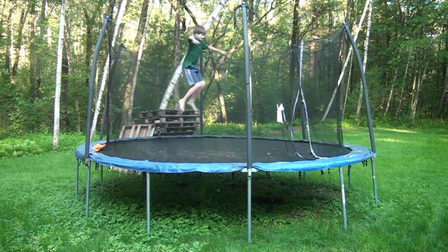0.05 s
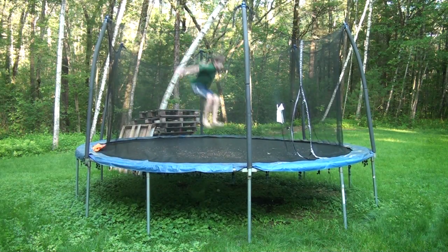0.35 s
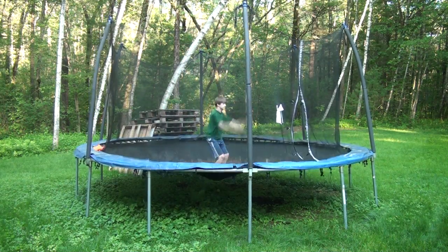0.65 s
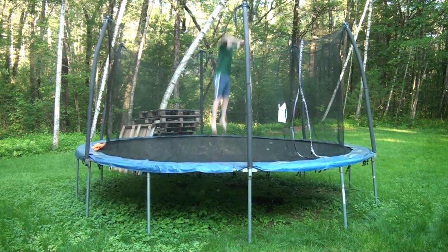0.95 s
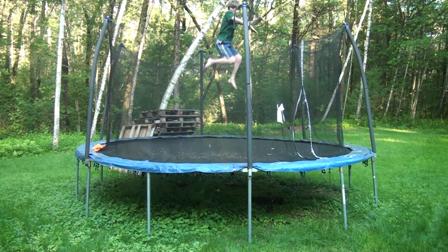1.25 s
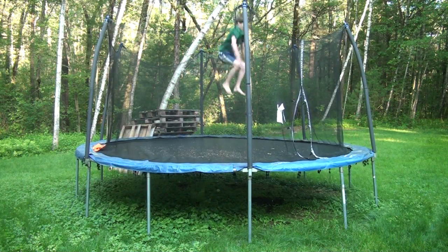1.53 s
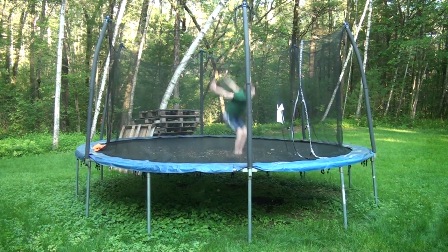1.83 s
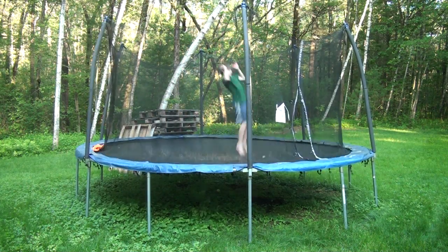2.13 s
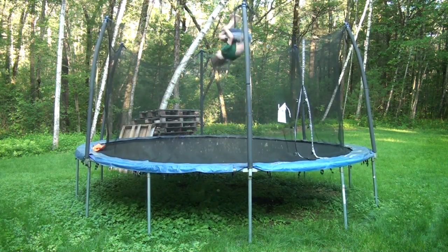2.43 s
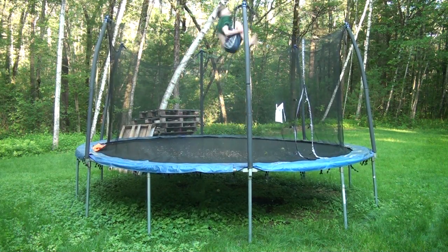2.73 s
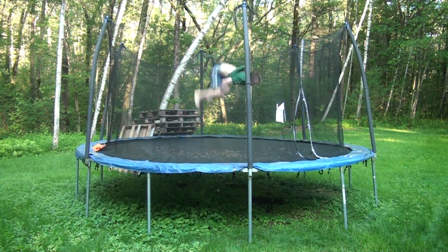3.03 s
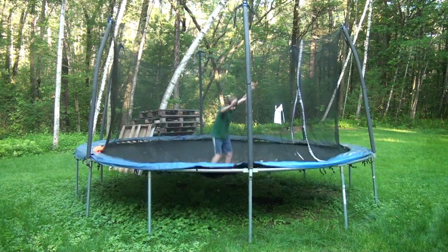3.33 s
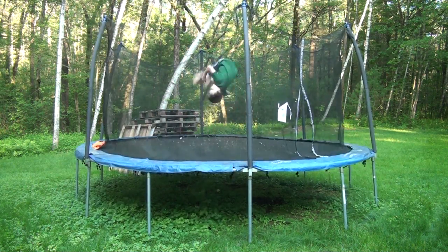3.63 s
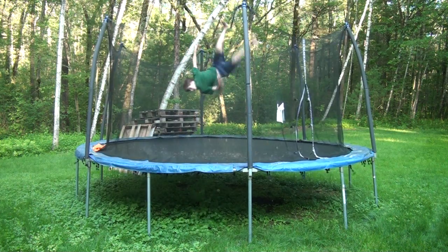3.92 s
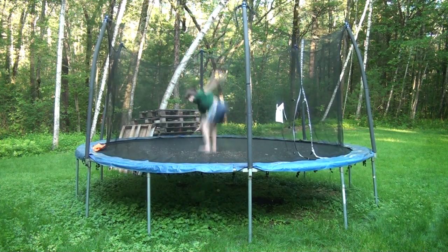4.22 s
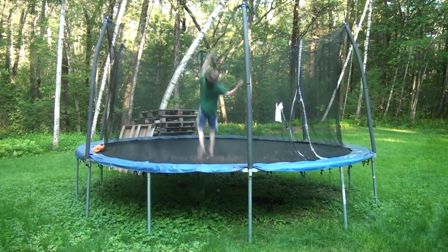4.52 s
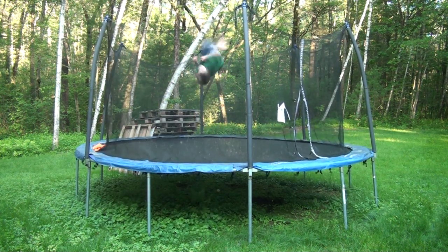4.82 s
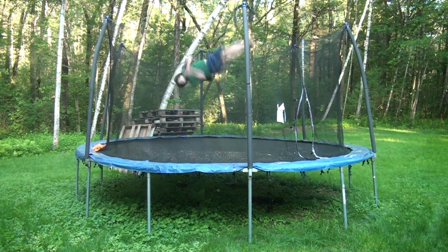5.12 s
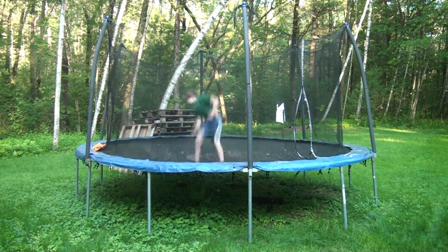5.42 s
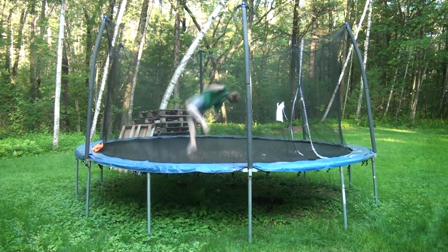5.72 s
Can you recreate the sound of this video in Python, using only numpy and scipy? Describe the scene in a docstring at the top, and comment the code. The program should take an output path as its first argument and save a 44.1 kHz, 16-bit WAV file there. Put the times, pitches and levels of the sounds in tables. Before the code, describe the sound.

Someone bounces on a garden trampoline, with feet slapping the mat and metal springs creaking, clanking and jangling.

```python
"""Five bounces on a garden trampoline

Feet slap the mat a few metres away, and the springs creak as their hooks stick and slip under load.
The frame clanks on each rebound; the unloaded springs jangle and clink while the jumper is in the air.
Fabric rustles, trees echo faintly, and two thin whistles sound over the garden air and a quiet hum."""
import sys
import numpy as np
from scipy import signal
from scipy.fft import rfft, irfft
from scipy.io import wavfile
from scipy.ndimage import uniform_filter1d

SR = 44100
rng = np.random.default_rng(int(sys.argv[2]) if len(sys.argv) > 2 else 0)


def generate_wav(sig):
    """Save sig (samples, or channels by samples) to the path in sys.argv[1] as 16-bit PCM at SR."""
    pcm = np.round(np.clip(np.atleast_2d(sig).T, -1, 1) * 32767).astype(np.int16)
    wavfile.write(sys.argv[1], SR, pcm)


N = 258426
TIME = np.arange(N) / SR
EARLIER_REBOUND_S = -0.35  # the jumper is already in the air at the start

# Levels in all tables are relative.
# the mat sinking: touchdown_s, creak_db, slack_lasts_s, deepest_after_s, boom_db
LANDINGS = [(0.558, -2.5, .085, .15, -34.5), (1.883, -1.5, 0.05, 0.14, -33.5), (3.212, 1, .07, .13, -29),
            (4.296, 1, .092, 0.137, -34), (5.449, 2, 0.052, 0.14, -34.5)]
# the mat whipping back: time_s, clank_db, clank_fall_s, thud_db, thud_lag_s, jangle_db, swing_period_s
REBOUNDS = [(0.777, -16, 0.024, -27.5, 0.023, -1, 0.16), (2.112, -10, 0.015, -24, 0.0076, .5, 0.11),
            (3.433, -11, 0.028, -23.5, 0.017, 1, 0.1), (4.522, -14.5, 0.021, -24.5, .005, -2, 0.128),
            (5.666, -11, 0.019, -24, 0.0023, 1.5, 0.17)]
# spectra of a coil, a hook's snap and its topmost sparkle: frequency_hz, level_db
COIL_SPECTRUM = [(100, -11), (300, -15.5), (600, -6), (950, -6.5), (1200, -3), (1500, -3), (1900, 0.5),
                 (2500, -2.5), (3200, -3), (4200, -10.5), (6000, -9.5), (12000, -49)]
SNAP_SPECTRUM = [(1500, -41), (3500, -13), (4700, -2.5), (5600, 6), (8000, 9), (9500, 3), (11000, -8),
                 (15500, -27)]
SPARKLE_SPECTRUM = [(6000, -36), (9000, -11), (10500, -3), (15500, 11)]


def amp(db):
    """Decibels to amplitude ratio."""
    return 10 ** (np.asarray(db) / 20)


def unit(x):
    """Normalisation to rms 1."""
    return x / np.sqrt(np.mean(x ** 2))


def norm(x):
    """Normalisation to energy 1."""
    return x / np.sqrt(np.sum(x ** 2))


def even(x, window_s):
    """Envelope flattening: short-term rms is held at 1, finer grain remains."""
    return x / np.sqrt(uniform_filter1d(x ** 2, int(window_s * SR)) + 1e-12)


def gains(spectrum, size):
    """Log-frequency interpolation of (frequency_hz, level_db) points to a gain per bin."""
    hz, db = np.transpose(spectrum)
    bin_hz = np.arange(size // 2 + 1) * SR / size
    return amp(np.interp(np.log(bin_hz + 1), np.log(hz + 1), db))


def response(spectrum, size=4096):
    """Minimum-phase impulse response of a spectrum, energy 1."""
    cepstrum = irfft(np.log(gains(spectrum, size)))
    cepstrum[1:size // 2] *= 2
    cepstrum[size // 2 + 1:] = 0
    return norm(irfft(np.exp(rfft(cepstrum))))


def through(x, *responses):
    """Convolution with each impulse response in turn."""
    for h in responses:
        x = signal.fftconvolve(x, h)[:len(x)]
    return x


def ring(modes):
    """Free decay of damped modes (frequency_hz, level_db, t60_s), energy 1."""
    t = TIME[:SR // 2]
    return norm(sum(amp(db - 60 * t / t60) * np.sin(2 * np.pi * hz * t + rng.uniform(0, 2 * np.pi))
                    for hz, db, t60 in modes))


def tone(hz):
    """Sinusoid of rms 1 whose phase is the integral of frequency."""
    return np.sqrt(2) * np.sin(2 * np.pi * np.cumsum(hz) / SR)


def walk(rate_hz):
    """Smooth random modulation, rms 1."""
    hold = max(int(SR / rate_hz), 2)
    steps = np.repeat(rng.standard_normal(N // hold + 1), hold)
    return unit(uniform_filter1d(steps, hold)[:N])


def slips(rate_hz, spread_db):
    """Stick-slip friction as a Poisson train of unequal clicks, rms 1."""
    size = amp(spread_db * np.minimum(rng.standard_exponential(N), 4))
    return unit((rng.random(N) < rate_hz / SR) * size * rng.choice([-1, 1], N))


def swell(peak_s, rise_s, fall_s, start=0.23):
    """Envelope with a jolt, a linear rise and an exponential decay."""
    t = TIME - peak_s
    rise = 1 + (1 - start) * np.minimum(t, 0) / rise_s
    return (t > -rise_s) * rise * np.exp(-np.maximum(t, 0) / fall_s)


def add(track, start_s, sound):
    """Superposition of a sound on a track."""
    i = max(int(start_s * SR), 0)
    track[i:i + len(sound)] += sound[:N - i]


def garden():
    """Ambient noise: broadband outdoor air and a thin, wavering hum."""
    # outdoor air: frequency_hz, level_db
    air_spectrum = [(15, -44), (25, -11), (59, -1.5), (127, -5.5), (180, -5.5), (301, -9.5), (531, -12),
                    (575, -12), (1230, -12.5), (1520, -17.5), (2480, -18), (2840, -22), (4610, -26),
                    (13600, -25.5), (16000, -29)]
    # tones of the hum: pitch_hz, level_db
    hum_tones = [(123.8, -60), (2519, -61.5), (5039, -77)]
    rolloff = response([(3000, 0), (7000, -0.5), (12000, -8)])
    air = through(rng.standard_normal(N), response(air_spectrum), rolloff)
    hum = sum(amp(db) * tone(hz + 4 * walk(rate_hz=25)) for hz, db in hum_tones)
    return unit(air) * amp(-50 + 0.38 * walk(rate_hz=3.46)) + amp(-1.5) * hum


def coil(low_hz, high_hz, t60_s, ring_db, count=24):
    """Impulse response of a spring: a dry tick and the close modes of its wire."""
    h = amp(ring_db) * ring([(hz, 0, t60_s) for hz in rng.uniform(low_hz, high_hz, count)])
    h[0] += 1
    return norm(h)


def springs(low_hz, high_hz, rate_hz, t60_s, ring_db, turn_db):
    """Friction excites the modes of six springs, which take the lead at random."""
    out = 0
    for _ in range(6):
        friction = slips(rate_hz, spread_db=2.5)
        share = amp(turn_db * walk(rate_hz=35) + 3.7 * walk(rate_hz=1.48))
        out += through(friction * share, coil(low_hz, high_hz, t60_s, ring_db, count=12))
    return out


def jangle(fade_db_per_s, hold_s=0.14, depth_db=5.5, settle_s=0.16):
    """Damped oscillation of the empty mat modulates the fading envelope of loose slipping."""
    out = 0
    for s, *_, db, period_s in [(EARLIER_REBOUND_S, -1, 0.14), *REBOUNDS]:
        age = np.maximum(TIME - s, 0)
        swing_db = depth_db * np.exp(-age / settle_s) * np.cos(2 * np.pi * age / period_s)
        fade_db = fade_db_per_s * np.maximum(age - hold_s, 0)
        out += (age > 0) * amp(db + swing_db - fade_db)
    return out


def stretch(power, contact_s=0.26, jolt=0.15, slack_db=-5):
    """Loaded slipping follows a power of the mat's half-sine sag, weaker until the slack is taken up."""
    out = 0
    for s, db, slack_s, _, _ in LANDINGS:
        age = TIME - s
        in_contact = (age > 0) * (age < contact_s)
        sag = np.abs(np.sin(np.pi * age / contact_s))
        out += in_contact * amp(db + slack_db * (age < slack_s)) * (jolt + sag) ** power
    return out


def slipping_db(load_db, power, loose_db, fade_db_per_s):
    """Power sum of the loaded and loose envelopes of the springs."""
    loaded = amp(load_db) * stretch(power)
    loose = amp(loose_db) * jangle(fade_db_per_s)
    return 20 * np.log10(np.hypot(loaded, loose) + 1e-6)


def ticks(rate_hz=45, chatter_s=0.0066):
    """Random transients: lesser hooks snap in decaying bursts of noise."""
    decay = np.exp(-TIME[:SR // 16] / chatter_s)
    bursts = through(np.abs(slips(rate_hz, spread_db=-1)), decay) * rng.standard_normal(N)
    snap = through(bursts, response(SNAP_SPECTRUM))
    sparkle = through(bursts, response(SPARKLE_SPECTRUM))
    return amp(-14) * unit(snap + amp(-16.5) * sparkle)


def creak(bite=1.82):
    """Stick-slip friction: coils sound in the midrange, hooks scrape above; hard scraping sizzles."""
    # a hook scraping: frequency_hz, level_db
    scrape_spectrum = [(2000, -23), (3500, -4), (4800, -10.5), (5600, -5), (6400, -1.5), (7800, -4),
                       (9000, -3.5), (11000, -12), (15500, -17.5)]
    jerks_db = 1.56 * walk(rate_hz=90) + 0.71 * walk(rate_hz=21)
    body_db = slipping_db(load_db=-26.5, power=1.45, loose_db=-32, fade_db_per_s=55) + jerks_db
    scrape_db = slipping_db(load_db=-27, power=1.46, loose_db=-33.5, fade_db_per_s=65.5) + jerks_db
    coils = springs(low_hz=1097.5, high_hz=3031, rate_hz=600, t60_s=0.082, ring_db=-9, turn_db=3.5)
    hooks = springs(low_hz=5584, high_hz=8720, rate_hz=1700, t60_s=0.094, ring_db=-8.5, turn_db=6)
    sizzle = through(slips(rate_hz=2500, spread_db=-6), response(SPARKLE_SPECTRUM))
    sizzle *= amp(bite * scrape_db - 9 + 4.2 * walk(rate_hz=41))
    body = even(through(coils, response(COIL_SPECTRUM)), window_s=0.047)
    scrape = even(through(hooks, response(scrape_spectrum)), window_s=0.03) + ticks()
    return body * amp(body_db) + scrape * amp(scrape_db) + sizzle


def clinks(detune=0.0099):
    """Impact excitation: a hook snaps over, chatters in its eye, rings and shakes its coil."""
    # the loudest snaps: start_s, snap_db, coil_db, sparkle_db, chatter_s
    hook_snaps = [(.018, -44, -29, -37, 0.0066), (.070, -33.5, -30.5, -40, 0.012),
                  (.104, -39, -32, -54, 0.011), (.140, -35.5, -30, -56, 0.0093),
                  (.771, -17.5, -12, -38, 0.0044), (.8945, -17.5, -26, -28, 0.0058),
                  (.921, -31, -15.5, -42, 0.027), (1.024, -15, -18, -23, 0.015),
                  (1.937, -18, -11.5, -36, 0.021), (1.976, -12, -19, -33, 0.017),
                  (2.034, -23, -41, -22, 0.022), (2.184, -13, -27, -20, 0.0075),
                  (2.214, -18, -14.5, -40, 0.023), (2.4515, -25.5, -24.5, -31, 0.0037),
                  (2.559, -28.5, -50, -48, .007), (2.588, -27.5, -34, -47, 0.012),
                  (3.221, -21.5, -21.5, -28, 0.024), (3.282, -14.5, -19.5, -42, .0066),
                  (3.415, -15, -12.5, -35, 0.0045), (3.513, -13.5, -39, -22, 0.015),
                  (3.613, -18, -29, -25, 0.018), (3.644, -15, -21, -24, 0.014),
                  (3.742, -29, -28, -47, .006), (4.113, -34, -44, -57, .018), (4.299, -28, -32, -40, 0.017),
                  (4.346, -18.5, -22, -40, 0.018), (4.3895, -10, -15.5, -30, 0.0036),
                  (4.531, -16, -20, -24, 0.016), (4.604, -14, -28, -22, 0.011),
                  (4.657, -16.5, -33, -29, .005), (4.762, -12.5, -18, -22, 0.015),
                  (4.835, -25, -19.5, -40, 0.017), (4.916, -30, -32, -62, .013),
                  (5.488, -15, -25, -35, 0.0083), (5.547, -12, -23, -35, .007),
                  (5.712, -14, -11, -35, 0.019), (5.812, -6.5, -16, -27, 0.0038)]
    # modes of a steel hook: frequency_hz, level_db, t60_s
    hook_modes = [(6270, -2, 0.036), (6480, 11, 0.072), (7340, -23, 0.13), (7800, 8, 0.057),
                  (8570, 6, 0.028), (9340, -36, 0.062)]
    snaps, sparkles, rings, coils = np.zeros((4, N))
    t = TIME[:SR // 8]
    chatter = even(slips(rate_hz=6600, spread_db=1.5), window_s=0.0069)
    for k, (s, snap_db, coil_db, sparkle_db, chatter_s) in enumerate(hook_snaps):
        burst = norm(chatter[k * len(t):(k + 1) * len(t)] * np.exp(-t / chatter_s))
        burst[0] += min(0.0015 / chatter_s, 0.6)  # a quick snap starts with a harder tick
        steel = ring(np.array(hook_modes) * [1 + detune * rng.standard_normal(), 1, 1])
        add(snaps, s, amp(snap_db + 14) * burst)
        add(sparkles, s, amp(sparkle_db + 19.5) * burst)
        add(rings, s, amp(snap_db + 8.5) * norm(through(burst, steel)))
        add(coils, s, amp(coil_db + 16) * burst)
    wire = coil(low_hz=1082, high_hz=3053, t60_s=0.14, ring_db=-10)
    contact = through(snaps, response(SNAP_SPECTRUM)) + through(sparkles, response(SPARKLE_SPECTRUM))
    return contact + rings + through(coils, response(COIL_SPECTRUM), wire)


def rustle(delay_s=0.52, rise_s=0.1, fall_s=0.4):
    """Friction noise: fine grains of fabric swell near the top of each flight."""
    flight = sum(swell(s + delay_s, rise_s, fall_s, start=0.1) for s, *_ in REBOUNDS)
    flight += amp(-8.5) * swell(EARLIER_REBOUND_S + delay_s, rise_s, fall_s, start=0.1)
    grains = slips(rate_hz=2100, spread_db=0.5) * amp(2 * walk(rate_hz=24))
    fabric = response([(3000, -21), (6000, -4.5), (8500, 1), (14000, -3.5), (16000, -5)])
    return amp(-52.5) * flight * through(grains, fabric)


def whistles(top_hz=2080, glide_s=0.44, length_s=0.22):
    """Frequency modulation: thin, unsteady whistles, probably a far bird, slide down and fade."""
    # faint whistles: start_s, level_db
    calls = [(.36, -63), (1.605, -61)]
    out, t = np.zeros(N), TIME[:int(length_s * SR)]
    hz = top_hz * np.exp(-t / glide_s) * (1 + 0.021 * walk(rate_hz=300)[:len(t)])
    envelope = np.minimum(t / 0.01, 1) * (1 - t / length_s)
    for s, db in calls:
        add(out, s, amp(db) * envelope * tone(hz))
    return out


def footfall(flutter_db, push_s=0.004, flutter_hz=170, flutter_s=0.046, skin_s=0.021):
    """Air displacement: a bare foot pats the mat and drives off one pulse; the cloth flutters."""
    t = TIME[:SR // 6]
    push = np.sin(np.pi * np.minimum(t / push_s, 1)) ** 4
    backswing = 0.26 * np.sin(np.pi * np.clip(t / push_s - 0.5, 0, 1)) ** 2
    cloth = signal.butter(3, [flutter_hz / 2, flutter_hz * 2], "band", fs=SR, output="sos")
    flutter = unit(signal.sosfilt(cloth, rng.standard_normal(len(t)))) * np.exp(-t / flutter_s)
    skin = response([(200, -15), (500, 1), (1500, 4), (3000, -29), (9000, -12)])
    pat = through(rng.standard_normal(len(t)) * np.exp(-t / skin_s), skin)
    return push - backswing + amp(flutter_db - 2.5) * flutter + amp(-21) * pat


def mat(boom_s=0.018):
    """Membrane under impact: feet slap the mat, and at full stretch the taut cloth booms softly."""
    # bare feet meeting the mat: start_s, level_db, flutter_db
    footfalls = [(0.556, -23, -17), (1.884, -21.5, -12), (3.215, -19.5, -10), (4.305, -30, -6.5),
                 (5.448, -17.5, -9.5), (5.5, -18.5, -17.5)]
    slaps = np.zeros(N)
    for s, db, flutter_db in footfalls:
        add(slaps, s, amp(db) * footfall(flutter_db))
    load = sum(amp(db) * np.exp(-((TIME - s - deepest_s) / boom_s) ** 2)
               for s, _, _, deepest_s, db in LANDINGS)
    cloth = response([(25, -14), (55, -8), (80, -7), (104, 4), (135, -1), (190, -14), (500, -36)])
    boom = load * even(through(rng.standard_normal(N), cloth), window_s=0.025)
    highpass = signal.butter(1, 55, "high", fs=SR, output="sos")
    return signal.sosfilt(highpass, slaps) + boom


def frame():
    """Tube resonance: as the mat whips level the joints shift and knock; a low thud follows."""
    # modes of the tubes: frequency_hz, bandwidth_hz, level_db
    tube_modes = [(1166, 70, -2), (1810, 110, 8), (1990, 220, 6.5), (2370, 103, 5.5), (2610, 290, -12),
                  (3760, 300, -16)]
    # spectra of the knocking joints and of the thud: frequency_hz, level_db
    clank_spectrum = [(300, -14.5), (700, -6), (980, -17.5), (1180, 5), (1450, 1.5), (1850, 4.5),
                      (2600, 0.5), (3200, -4.5), (4500, -16.5), (7000, -9), (11000, -17), (15500, -22)]
    thud_spectrum = [(25, -12), (50, -15), (110, -2), (250, -2.5), (500, -6), (800, -9), (1300, -12),
                     (4000, -58)]
    shift = sum(amp(db) * swell(s, rise_s=0.0087, fall_s=fall_s) for s, db, fall_s, *_ in REBOUNDS)
    load = sum(amp(db) * swell(s + lag_s, rise_s=0.025, fall_s=0.026)
               for s, _, _, db, lag_s, *_ in REBOUNDS)
    tubes = ring([(hz, db, np.log(1000) / (np.pi * width_hz)) for hz, width_hz, db in tube_modes])
    knocks = slips(rate_hz=3000, spread_db=-2)
    clank = through(knocks, response(clank_spectrum)) + amp(-4) * through(knocks, tubes)
    thud = through(slips(rate_hz=1500, spread_db=1.5), response(thud_spectrum))
    return amp(-5) * shift * even(clank, window_s=0.02) + amp(1.5) * load * even(thud, window_s=0.0193)


def squeaks():
    """Mode locking: now and then the slipping settles on one mode of a coil."""
    # squeaks of single coils: centre_s, pitch_hz, level_db, half_width_s
    coil_squeaks = [(1.952, 1820, -29, 0.0087), (4.654, 1744, -37, 0.016), (4.73, 1180, -39, 0.015),
                    (4.8, 2210, -42, 0.022)]
    out = 0
    for s, hz, db, half_width_s in coil_squeaks:
        envelope = amp(db) * np.exp(-((TIME - s) / half_width_s) ** 2)
        out += envelope * tone(hz * (1 + 0.021 * walk(rate_hz=160)))
    return out


def glide(centre_s=5.813, hz=447, fall_octaves_per_s=7, half_width_s=0.026):
    """Exponential sweep: a short, hollow, pure tone swells and slides down."""
    age = np.clip(TIME - centre_s, -4 * half_width_s, 4 * half_width_s)
    return amp(-28) * np.exp(-(age / half_width_s) ** 2) * tone(hz * 2 ** (-fall_octaves_per_s * age))


def linger(metal, low_hz=1900, high_hz=2700, t60_s=0.85):
    """Sympathetic vibration: the whole circle of springs sings on quietly once shaken."""
    modes = [(hz, 0, t60_s) for hz in rng.uniform(low_hz, high_hz, size=200)]
    return amp(-25) * through(metal, ring(modes))


def trees(x, wet_db, t60_s=0.75, onset_s=0.045):
    """Scattering: trunks and leaves return a thin, late echo."""
    t = TIME[:SR]
    build_up = 1 - np.exp(-(t / onset_s) ** 2)
    echo = norm(rng.standard_normal(SR) * amp(-60 * t / t60_s) * build_up)
    colour = response([(100, 1.5), (500, 8.5), (2200, 3.5), (6500, -2.5), (14000, -27)])
    return amp(wet_db) * through(x, echo, colour)


def scene():
    """Mid-side stereo: the trampoline is ahead, the left leading slightly in phase; air is all around."""
    # width of the trampoline and of the air: frequency_hz, side_minus_mid_db
    trampoline_width = [(30, -22), (70, -25), (150, -18.5), (550, -13), (1100, -20), (2500, -20.5),
                        (4400, -9.5), (8000, -33), (15000, -44)]
    air_width = [(60, -33), (110, -35), (200, -22), (400, -12.5), (1300, -11.5), (4400, -9), (8000, -26),
                 (15000, -42)]
    metal = creak() + squeaks() + frame() + clinks()
    direct = metal + linger(metal) + mat() + rustle() + glide() + whistles()
    mid = direct + trees(direct, wet_db=-23.5) + garden()
    direct_side = irfft(1j * rfft(direct) * gains(trampoline_width, N), N)
    air_side = irfft(rfft(garden()) * gains(air_width, N), N)
    side = direct_side + air_side + trees(direct, wet_db=-34.5)
    return np.array([mid + side, mid - side])


def record(dry):
    """Band limiting: a steep low-pass removes the treble above 16.1 kHz."""
    return signal.sosfilt(signal.ellip(10, 0.2, 80, 16100, fs=SR, output="sos"), dry)


dry = scene()
out = record(dry)
generate_wav(out)
```